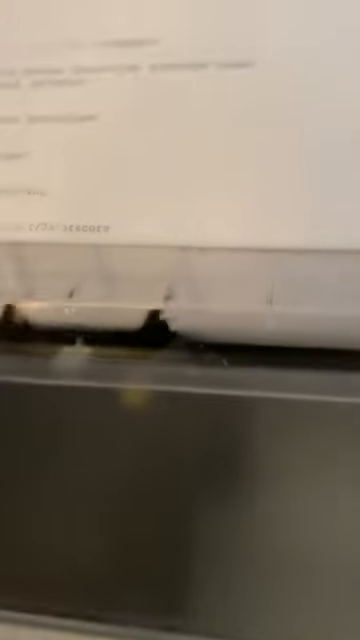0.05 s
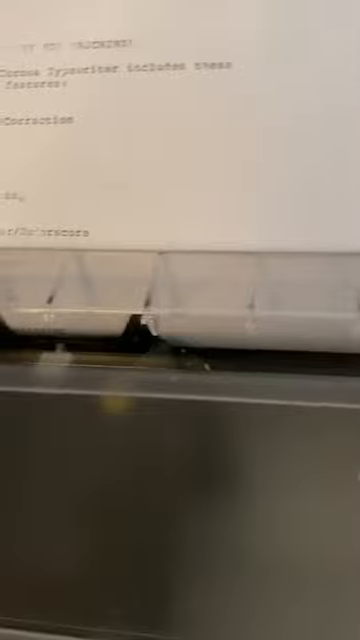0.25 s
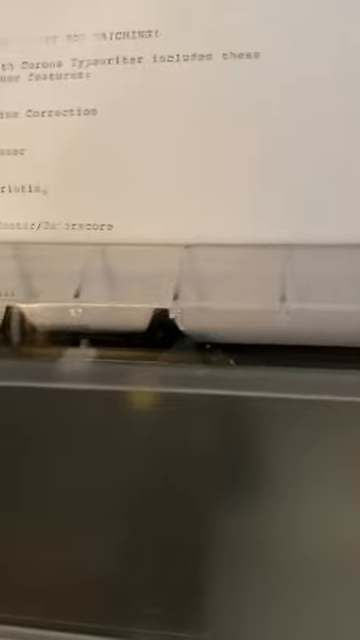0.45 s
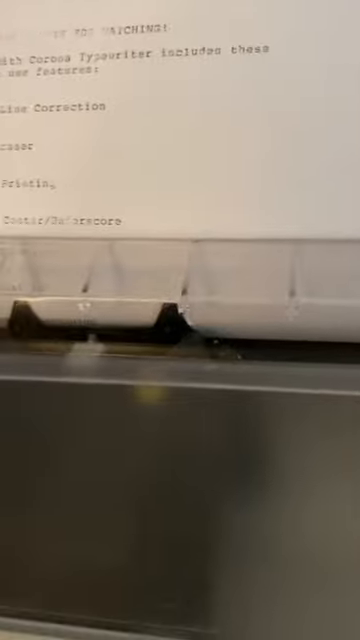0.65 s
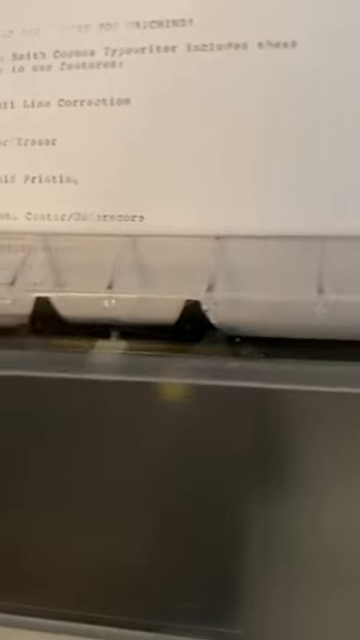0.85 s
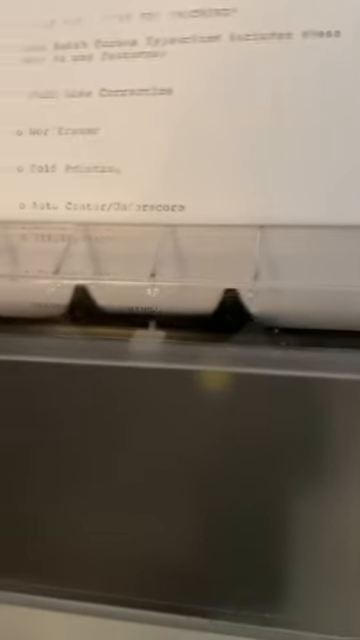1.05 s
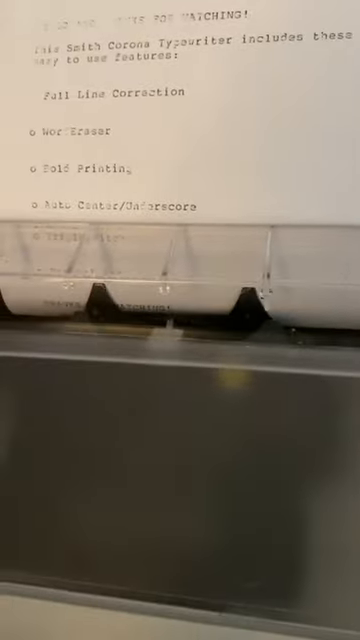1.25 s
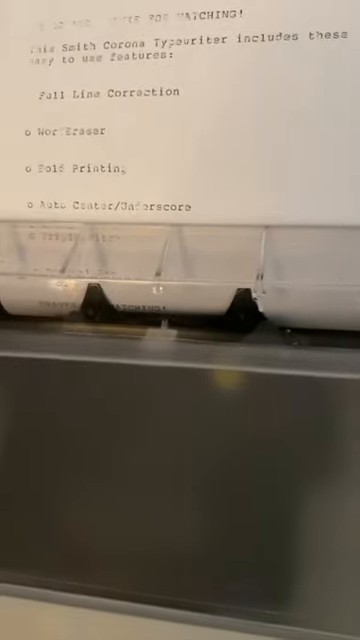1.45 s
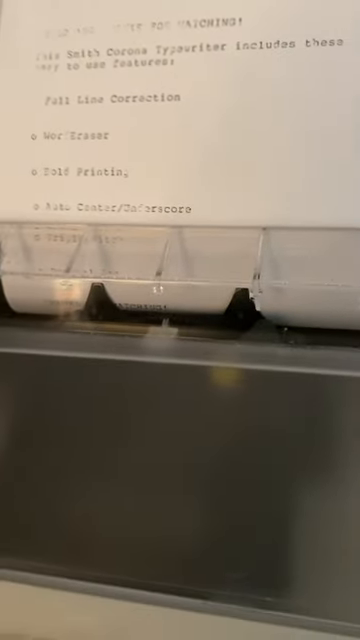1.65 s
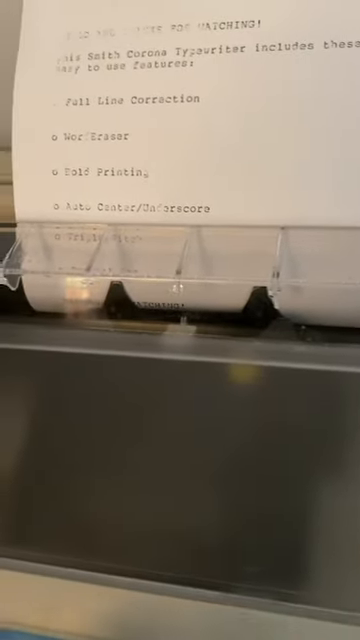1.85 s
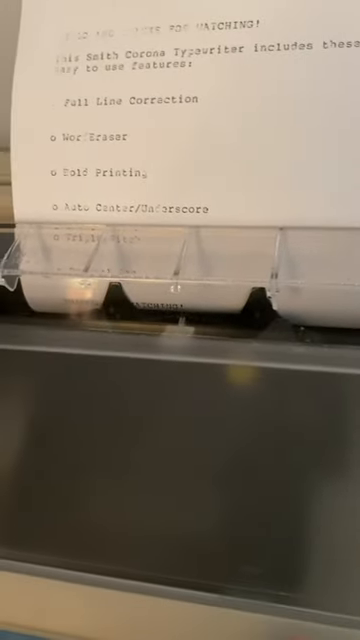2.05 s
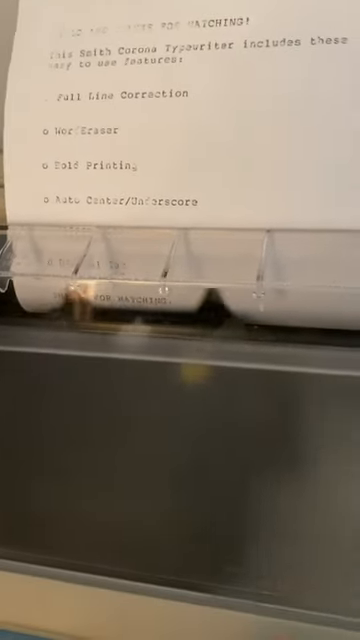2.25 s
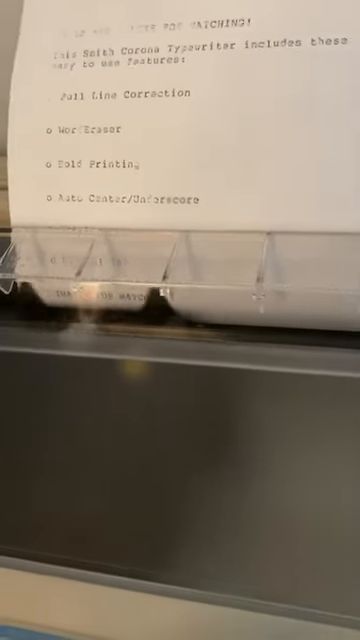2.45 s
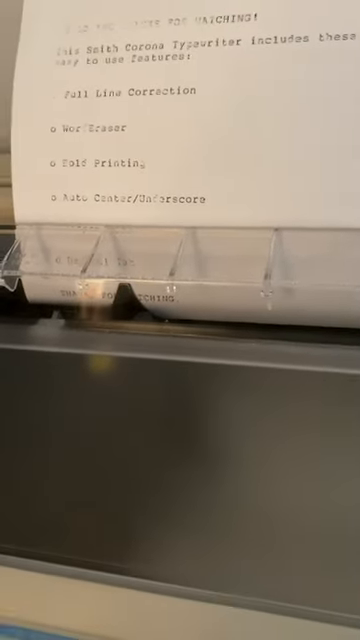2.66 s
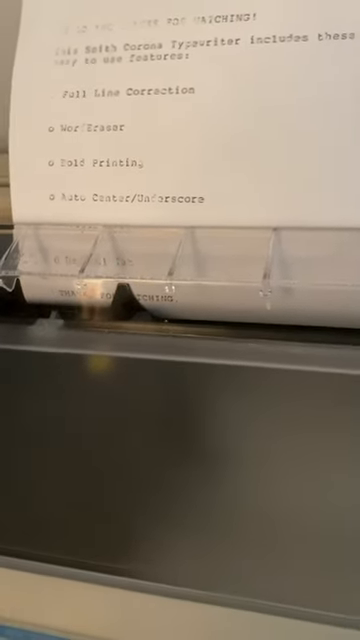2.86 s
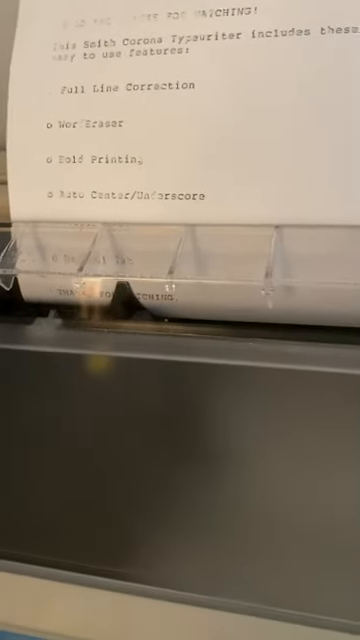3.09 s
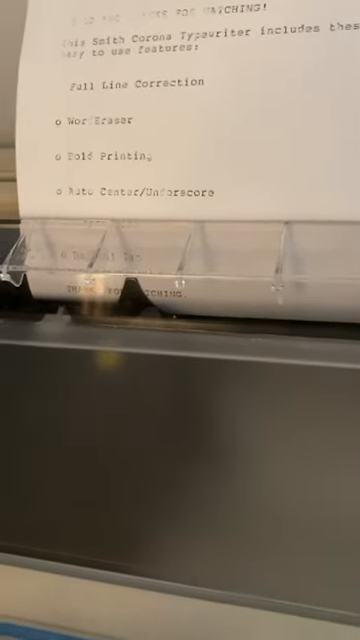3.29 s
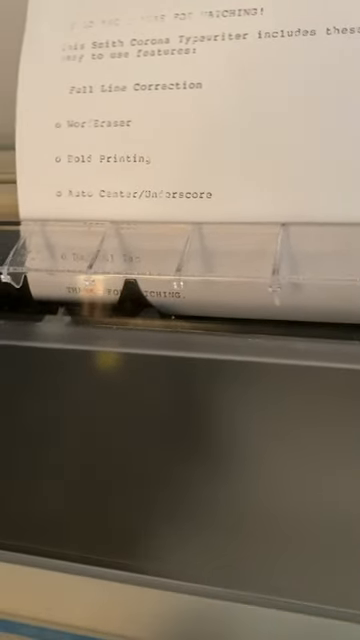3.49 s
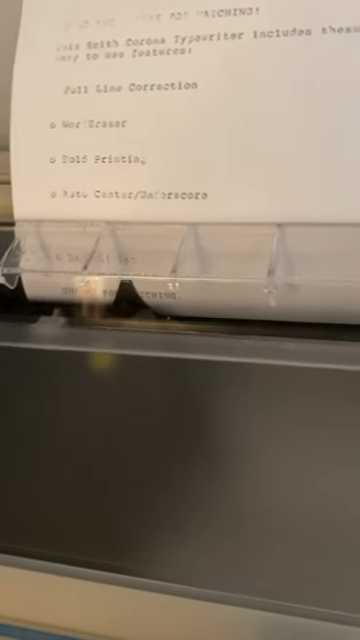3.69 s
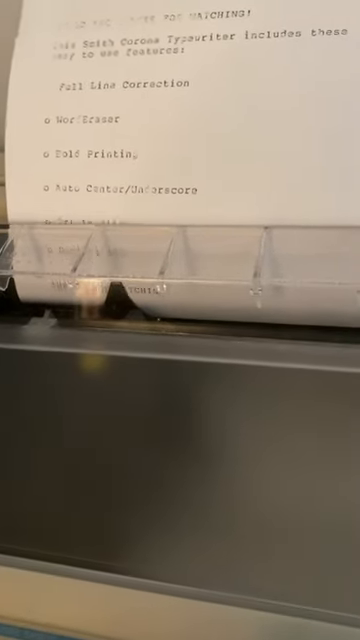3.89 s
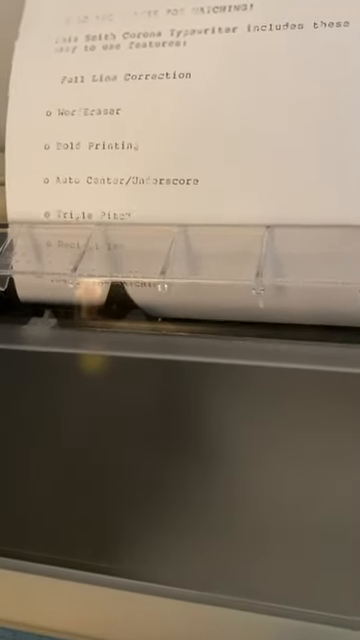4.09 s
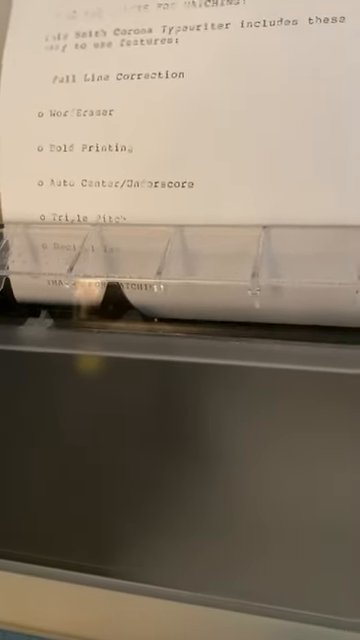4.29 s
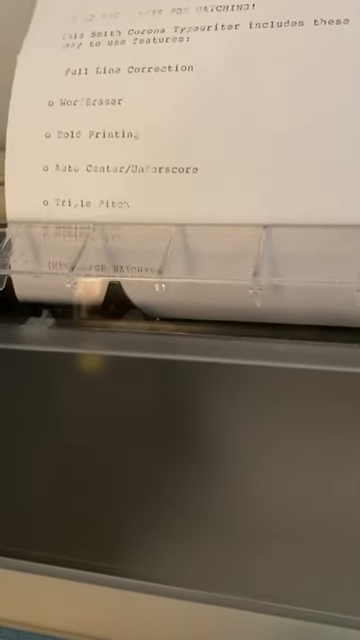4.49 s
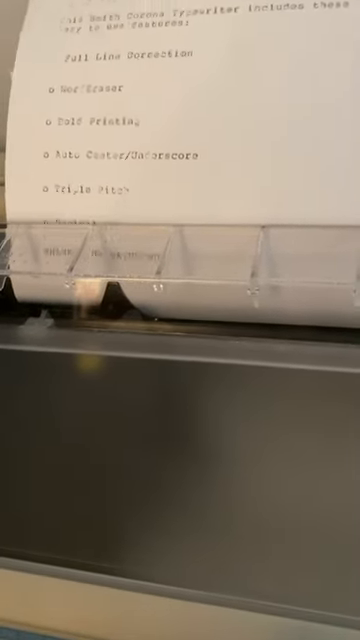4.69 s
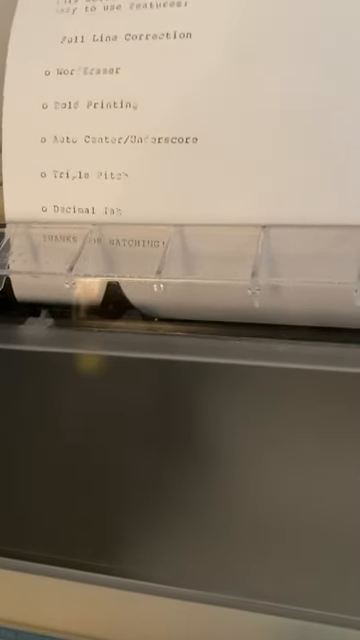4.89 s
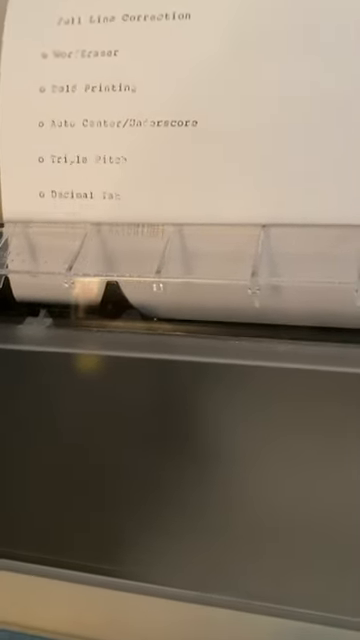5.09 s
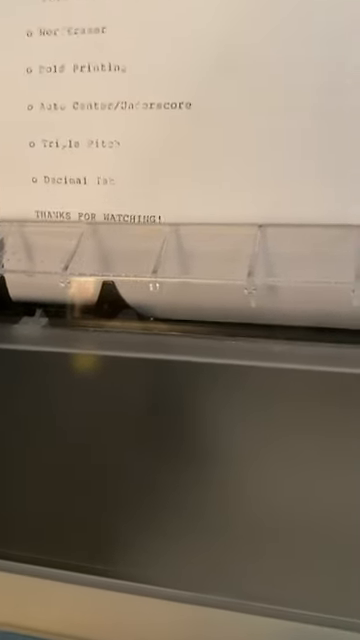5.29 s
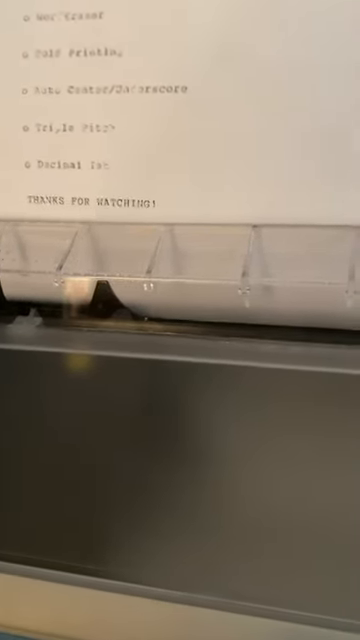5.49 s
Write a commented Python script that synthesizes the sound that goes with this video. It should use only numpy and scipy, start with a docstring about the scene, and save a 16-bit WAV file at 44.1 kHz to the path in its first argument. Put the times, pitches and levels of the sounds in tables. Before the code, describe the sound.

Close sharp clacks and a heavy carriage knock, followed by brief groaning motor whirs and a steady grinding buzz as paper feeds out.

```python
"""Mains hum and building rumble of a quiet room, then an electronic typewriter close by: solenoid clacks
and a carriage knock, short broadband blows that excite resonances of plastic case, metal parts and frame.
A stepper motor feeds the paper in bursts: its tones are multiples of one rotor cycle, and it groans in short
tones, while fluttering noise makes the case rumble and the gear grind. Decaying noise bursts are the crackling sheet."""
import sys
import numpy as np
from scipy import signal
from scipy.fft import rfft, irfft
from scipy.io import wavfile
from scipy.ndimage import uniform_filter1d

SR = 44100
rng = np.random.default_rng(int(sys.argv[2]) if len(sys.argv) > 2 else 0)


def generate_wav(sig):
    """Save sig (samples, or channels by samples) to the path in sys.argv[1] as 16-bit PCM at SR."""
    pcm = np.round(np.clip(np.atleast_2d(sig).T, -1, 1) * 32767).astype(np.int16)
    wavfile.write(sys.argv[1], SR, pcm)


N = 244314
HZ = np.fft.rfftfreq(N, 1 / SR)

# Spells in which the motor is powered. Each row: on and off in seconds, t60 of the coasting gears in seconds,
# spin-up in seconds, base levels in dB of whine, step tone, rotor tone, case rumble and gear grind,
# change of whine and step tone in dB per second.
FEEDS = [(2.128, 2.38, 0.26, 0.082, -32, -37, -44, -40, -44, -23),
         (2.419, 2.661, 0.19, .04, -34.5, -48, -43, -40, -47, -81),
         (3.742, 3.987, 0.16, 0.11, -32.5, -41, -54.5, -44.5, -46.5, 6.5),
         (4.03, 4.132, 0.11, 0.046, -32, -37, -45, -41.5, -49.5, -48),
         (4.167, 4.194, 0.16, 0.035, -38, -43, -47, -39.5, -52, -3),
         (4.236, 5.602, .1, 0.049, -33, -37, -48.5, -45, -47, -0.75)]


def motor():
    """Periodic torque gives harmonics of the rotor cycle; tooth and case contacts give modulated noise."""
    # Partials of the three tones. Each row: multiple of the rotor cycle, level in dB against the tone's level.
    whine = [(6, -0.5), (12, -16.5), (15, -23), (18, -35.5), (21, -28)]
    step = [(3, -2.5), (9, -27.5)]
    rotor = [(2, 2.5), (4, -6.5), (8, -28), (10, -16), (13, -8)]
    # Spectrum of the shaking case. Each row: frequency in Hz, relative level in dB.
    rumble_spectrum = [(40, -20.5), (90, 2.5), (150, 0.5), (300, 1), (500, -4.5), (850, -9), (1100, -15),
                       (2000, -39)]
    rotor_hz = 67.04   # three steps make one rotor cycle
    hum_stop_t60_s = .05   # the tones stop almost at once

    whine_db, step_db, rotor_db, rumble_db, grind_db = motor_levels()
    phase = 2 * np.pi * rotor_hz * np.arange(N) / SR + 0.027 * drift(22)
    hum = tones(whine, whine_db, phase) + tones(step, step_db, phase)
    hum += tones(rotor, rotor_db + 2.8 * drift(11), phase)
    rumble = from_db(rumble_db + 2.45 * drift(25)) * coloured(rumble_spectrum)
    teeth = rms_one((1 + backlash()) * grit(spread_db=-0.5))
    grind = from_db(grind_db + 1.54 * drift(35)) * teeth

    gears_on = powered(np.transpose(FEEDS)[2])
    tones_on = uniform_filter1d(powered([hum_stop_t60_s] * len(FEEDS)), size=220)
    # the root doubles the decay time: the heavy case shakes on twice as long as the gears
    case_on = uniform_filter1d(gears_on ** .5, size=220)
    return tones_on * hum + case_on * rumble, gears_on * grind


def motor_levels():
    """Transient start: tones rise as the rotor spins up, while the jolt of case and gears decays exponentially."""
    # Added wander; the first row also holds earlier, the last one later.
    # Each row: time in seconds, changes in dB of whine, step tone, case rumble and gear grind.
    wander = [(4.27, 3, -0.5, -1, 0), (4.36, 4, 0.6, -3, -2), (4.54, 3, 2, -5, 8.5),
              (4.63, 0.2, 1, -2, 4.5), (4.72, -1.5, .8, -2, 2), (4.94, 0.2, -0.7, .3, -3.5),
              (4.99, 1.9, -0.5, 4, 3.2), (5.064, 2, 3, -6.5, -7.5), (5.33, 2, -2, 1, 1.1),
              (5.4, 0, -12, 2.5, -0.5), (5.47, 3, -7, 2.5, 1), (5.54, 1.5, -16, -3, -5.5)]
    spin_up_db = -15   # the tones start this far below their running level
    jolt_db, bite_db, jolt_s = 7, 5.5, 0.072   # extra rumble and grind at each start, time constant
    grind_follows = 0.26   # share of the tones' slope that the grind makes too

    t, on = np.arange(N) / SR, np.transpose(FEEDS)[0]
    latest = np.searchsorted(on, t).clip(1) - 1
    on, off, coast, spin_s, whine, step, rotor, rumble, grind, slope = np.transpose(FEEDS)[:, latest]
    since = np.maximum(t - on, 0)
    tone = spin_up_db * np.clip(1 - since / spin_s, 0, 1) + slope * since
    jolt = np.exp(-since / jolt_s)
    whine_db, step_db, rumble_db, grind_db = in_time(wander)
    return (whine + tone + whine_db,
            step + tone + step_db,
            rotor + np.minimum(tone, 0) / 2,
            rumble + jolt_db * jolt + rumble_db,
            grind + bite_db * jolt + grind_follows * slope * since + grind_db)


def powered(t60_s):
    """Free decay after forcing: 1 while the motor is driven, an exponential fall after each stop."""
    t = np.arange(N) / SR
    spells = []
    for (on, off, *levels), t60 in zip(FEEDS, t60_s):
        fall = from_db(-60 * np.maximum(t - off, 0) / t60)
        spells.append((t >= on) * fall)
    return np.max(spells, axis=0)


def tones(orders, level_db, phase):
    """Harmonic synthesis: sines at multiples of the rotor phase, each of rms level_db plus its own dB."""
    partials = sum(from_db(db) * np.sin(k * phase + k * k) for k, db in orders)
    return np.sqrt(2) * from_db(level_db) * partials


def backlash():
    """Impact of loose teeth: random ticks with exponential dB spread, a few much harder, each decaying."""
    ticks_per_s, tick_db, t60_s = 70, -8, 0.02   # tick_db is the least height
    struck = rng.random(N) < ticks_per_s / SR
    extra_db = 2.96 * np.minimum(rng.exponential(1, N), 3)
    return signal.lfilter([1], [1, -from_db(-60 / (t60_s * SR))], struck * from_db(tick_db + extra_db))


def groans():
    """Frequency follows motor speed: short tones, most of them gliding, with a weaker octave."""
    # Speeding up or braking. Each row: start in seconds, length in seconds, start and end frequency in Hz,
    # level in dB.
    glides = [(2.135, 0.086, 106.7, 204, -38), (2.366, 0.047, 390, 302, -37),
              (2.422, 0.037, 295, 397, -36.5), (2.505, 0.036, 340, 340, -37), (2.566, 0.033, 327, 310, -36),
              (2.6, 0.068, 208.6, 97.4, -36), (4.027, 0.046, 220, 276, -39),
              (4.045, 0.046, 117.4, 125, -34.5), (4.17, 0.08, 143, 113, -37)]
    out = np.zeros(N)
    for s, length, start_hz, end_hz, db in glides:
        count = round(length * SR)
        phase = 2 * np.pi * np.cumsum(np.geomspace(start_hz, end_hz, count)) / SR
        tone = np.sin(phase) + 0.25 * np.sin(2 * phase)
        out[round(s * SR):][:count] += 2 * from_db(db) * np.hanning(count) * tone
    return out


def paper_crackle():
    """Impulsive release in the bending sheet: bursts of very uneven noise with a fast rise and slower decay."""
    # Each row: start in seconds, level in dB before the case colours it.
    crackles = [(2.249, -34.5), (2.372, -38), (2.557, -35), (4.121, -40), (4.565, -35), (4.591, -36.5),
                (4.62, -35), (4.741, -36), (4.777, -36.5), (4.825, -38.5), (4.872, -35.5), (4.889, -35.5),
                (5.006, -34), (5.279, -35), (5.371, -35.5), (5.384, -35.5), (5.493, -31)]
    rise_s, t60_s = 0.0012, 0.084
    return bursts([(s, db, rise_s, t60_s) for s, db in crackles]) * grit(spread_db=6.0)


def clacks():
    """Impact excitation: a short rattle drives case and metal; the heavier frame answers later and rings longer."""
    # Latch and hammer parts. Each row: frequency in Hz, relative level in dB, t60 in seconds.
    metal_parts = [(3211, -22.5, 0.031), (3670, -23.5, 0.0052), (3970, -31.5, 0.03), (5380, -32, 0.014)]
    # Desk and frame. Each row: frequency in Hz, level in dB against the thud, t60 in seconds.
    frame_modes = [(63.7, -9, 0.2), (116, -4, 0.25), (172, -7.5, 0.14), (203, -12.5, 0.11), (263.5, -7, .1),
                   (335, -6, 0.16), (422, -4, 0.083), (688, -5, 0.036), (857, -3, 0.063)]
    # Metal rail set ringing by the heaviest knock. Each row: frequency in Hz, level in dB, t60 in seconds.
    rail_modes = [(341.5, -55, 1.9), (530, -55, 1.4), (2820, -71.5, .9)]

    s, rattle_db, rise, t60, lift_db, metal_db, thud_db = contacts()
    contact = bursts(zip(s, rattle_db, rise, t60)) * grit(spread_db=2.0)
    latest = np.searchsorted(s, np.arange(N) / SR).clip(1) - 1
    rattle = treble(case(contact, patchy_db=4.5), lift_db[latest], hz=2570)
    metal_drive = contact * from_db(metal_db[latest])
    metal = sum(from_db(db) * ring(metal_drive, hz, ring_t60) for hz, db, ring_t60 in metal_parts)

    at = ((s + rise + .003) * SR).astype(int)
    frame = np.zeros(N)
    strength_db = 3 * rng.standard_normal((len(s), len(frame_modes)))   # each blow lands a little differently
    for k, (hz, db, ring_t60) in enumerate(frame_modes):
        push = np.full(N, 1e-18)
        push[at] = from_db(thud_db + db + strength_db[:, k]) * (-1) ** k
        frame += ring(push, hz, ring_t60)

    hardest = np.full(N, 1e-18)
    hardest[at[np.argmax(thud_db)]] = 1
    rail = sum(from_db(db) * ring(hardest, hz, ring_t60) for hz, db, ring_t60 in rail_modes)
    return rattle + metal + uniform_filter1d(frame, size=21) + rail


def contacts():
    """Collision and restitution: blows, a weaker rebound of each, and slow-rising carriage slides, in time order.

    Columns: start s, rattle dB, rise s, t60 s, treble lift dB, metal drive dB, thud dB."""
    # Clacks and knocks. Each row: start in seconds, rattle level in dB, t60 in seconds, treble lift in dB,
    # metal drive in dB, thud level in dB.
    blows = [(0.4217, -31, .046, 12.5, -21, -54), (0.427, -18.5, 0.036, 5, 5, -28.5),
             (.53, -55, 0.06, -18, -18, -50), (.57, -59.5, 0.053, -14, -23, -58),
             (0.905, -42, 0.042, -2.5, -17, -46), (1.095, -31.5, 0.067, 4, 3, -45),
             (1.101, -15, 0.028, 1.5, 6.5, -20), (1.129, -30.5, 0.02, 7.5, -14.5, -28.5),
             (1.173, -30, 0.026, 5.5, 8, -29), (1.2256, -33, 0.053, 5.5, 0.5, -48),
             (1.24, -33.5, 0.042, -8.5, -18, -38.5), (2.109, -45, 0.17, 4.5, -6, -45),
             (2.1354, -25, .021, -9.5, -3, -35.5), (3.733, -35, 0.013, 0, 16.5, -38),
             (3.7387, -25.5, 0.019, 8, 2, -30.5), (4.03, -48, 0.061, -5.5, -2, -40.5),
             (4.164, -34, 0.035, -20, -24, -39), (4.239, -41, 0.037, -4, -17, -32)]
    # One rebound: delay in seconds, rattle in dB against the blow, t60 in seconds, treble lift in dB,
    # metal drive in dB, thud in dB against the blow.
    rebound = (.013, -17.5, 0.17, -8.5, -9, -1)
    # The carriage slides. Each row: start in seconds, rattle level in dB, t60 in seconds.
    slides = [(.984, -31.5, 0.13), (1.041, -34, 0.41)]
    blow_rise_s, slide_rise_s = .0026, 0.014
    slide_lift_db, slide_metal_db, slide_thud_db = -8, -4, -42

    delay, less_rattle_db, rebound_t60, rebound_lift_db, rebound_metal_db, less_thud_db = rebound
    rows = []
    for s, db, t60, lift, metal, thud in blows:
        rows.append((s, db, blow_rise_s, t60, lift, metal, thud))
        rows.append((s + delay, db + less_rattle_db, blow_rise_s, rebound_t60,
                     rebound_lift_db, rebound_metal_db, thud + less_thud_db))
    for s, db, t60 in slides:
        rows.append((s, db, slide_rise_s, t60, slide_lift_db, slide_metal_db, slide_thud_db))
    return np.transpose(sorted(rows))


def case(x, patchy_db):
    """Modal radiation: plastic panels, unevenly driven, resonate over a broad base; white noise keeps its rms."""
    # Panel resonances. Each row: frequency in Hz, width in Hz, relative level in dB.
    panels = [(867, 91, 5.5), (1430.4, 89, 12.5), (2149, 170, 2.5), (2780, 150, 8), (3380, 390, 5),
              (4567, 720, 2), (5240, 190, 2.5), (6530, 870, 3.5), (7923, 400, 4.5), (9620, 900, -4),
              (14100, 1500, -7)]
    # Broad base. Each row: frequency in Hz, relative level in dB.
    base_spectrum = [(200, -13), (500, 7.5), (1000, 2.5), (3000, -2), (6000, -19), (10000, -13.5),
                     (15000, -37.5), (16000, -45.5)]
    uneven = [from_db(patchy_db * drift(24)) for panel in panels]

    def shape(v):
        out = irfft(rfft(v) * from_db(at_hz(base_spectrum)), N)
        for k, (hz, width_hz, db) in enumerate(panels):
            out = out + (-1) ** k * from_db(db) * resonance(v * uneven[k], hz, width_hz)
        return out

    return shape(x) / np.std(shape(rng.standard_normal(N)))


def tail(x):
    """Diffuse reverberation of desk and room: convolution with exponentially decaying noise."""
    level_db, t60_s, rise_s = -21, .22, 0.0086
    t = np.arange(SR // 2) / SR
    response = rng.standard_normal(len(t)) * from_db(-60 * t / t60_s) * np.minimum(t / rise_s, 1)
    unit_energy = response / np.sqrt(np.sum(response ** 2))
    return from_db(level_db) * signal.fftconvolve(x, unit_energy)[:N]


def room():
    """Stationary background: mains partials of wavering level, swelling building rumble and filtered noise."""
    # Mains partials. Each row: frequency in Hz, level in dB rms before wavering.
    mains = [(59.5, -64), (119, -66), (238, -69.5)]
    # Room noise spectrum. Each row: frequency in Hz, relative level in dB.
    room_spectrum = [(15, -62), (25, -24.5), (36, -6.5), (60, -2.5), (86, -14.5), (122, -1), (146, -20),
                     (180, -12.5), (265, -27.5), (357, -23), (383, -27), (528, -31.5), (6000, -48),
                     (7800, -75.5), (13200, -120)]
    room_db, rumble_db, hiss_db = -52.5, -57.5, -91.5

    t = np.arange(N) / SR
    hum = sum(np.sqrt(2) * from_db(db + 2.0 * drift(7)) * np.sin(2 * np.pi * hz * t) for hz, db in mains)
    # spectra as (Hz, relative dB)
    low_noise = coloured([(25, -34.5), (45, -6), (58, 22.5), (85, 10.5), (120, -44.5)])
    rumble = from_db(rumble_db + 2.5 * drift(1.5)) * low_noise
    hiss = from_db(hiss_db) * coloured([(4000, -30), (6500, 6.0), (14500, 4.5), (15500, 7.5), (16200, -7)])
    return hum + rumble + hiss + from_db(room_db) * coloured(room_spectrum)


def from_db(db):
    """Logarithmic level: dB to amplitude gain."""
    return 10 ** (np.asarray(db) / 20)


def rms_one(x):
    """Power normalisation: scale to rms 1."""
    return x / np.sqrt(np.mean(x ** 2) + 1e-20)


def in_time(rows):
    """Linear interpolation: columns of a timed curve, one value a sample."""
    s, *columns = np.transpose(rows)
    return [np.interp(np.arange(N) / SR, s, c) for c in columns]


def at_hz(points):
    """Interpolation on a log-frequency axis: a spectrum read at every FFT bin."""
    hz, values = np.transpose(points)
    return np.interp(np.log(HZ + 1), np.log(hz), values)


def coloured(spectrum):
    """Spectral shaping of white noise: steady noise of a given spectrum, rms 1."""
    return rms_one(irfft(rfft(rng.standard_normal(N)) * from_db(at_hz(spectrum)), N))


def drift(rate):
    """Low-passed random process: wander of spread 1, faster for a higher rate in Hz."""
    knots = rng.standard_normal(N // 40 + 2002)   # one every 40 samples
    r = np.exp(-80 * np.pi * rate / SR)
    slow = signal.lfilter([1], [1, -2 * r, r * r], knots)[2000:]   # without the filter's settling
    return np.interp(np.arange(N) / 40, np.arange(len(slow)), rms_one(slow))


def grit(spread_db):
    """Many small contacts: noise of rms 1 whose strength varies from millisecond to millisecond."""
    return rms_one(rng.standard_normal(N) * from_db(spread_db * drift(400)))


def bursts(rows):
    """Transient envelopes summed from rows (s, dB, rise s, t60 s): a linear rise, then exponential decay."""
    env = np.full(N, 1e-9)
    for s, db, rise, t60 in rows:
        start = round(s * SR)
        t = np.arange(N - start)[:SR // 2] / SR
        rise, t60 = max(rise, 2e-4), max(t60, 4e-3)
        fall = from_db(db - 60 * np.maximum(t - rise, 0) / t60)
        env[start:][:len(t)] += np.minimum(t / rise, 1) * fall
    return env


def resonance(x, hz, width_hz):
    """Damped resonator: two-pole band-pass, gain 1 on top."""
    r = np.exp(-np.pi * width_hz / SR)
    poles = [1, -2 * r * np.cos(2 * np.pi * hz / SR), r * r]
    return signal.lfilter([(1 - r * r) / 2, 0, (r * r - 1) / 2], poles, x)


def ring(x, hz, t60):
    """Impulse response of a mode: a unit click starts a decaying sine of initial height 1."""
    r, w = from_db(-60 / (t60 * SR)), 2 * np.pi * hz / SR
    return signal.lfilter([0, np.sin(w)], [1, -2 * r * np.cos(w), r * r], x)


def treble(x, lift_db, hz):
    """Shelving filter: raises or lowers what lies above hz; the lift may vary in time."""
    high = signal.sosfilt(signal.butter(1, hz, "high", fs=SR, output="sos"), x)
    return x + (from_db(lift_db) - 1) * high


def stereo(x):
    """Stereo image: left and right carry one sound with frequency-dependent phase and level, plus an unalike share."""
    # Each row: frequency in Hz, phase of left against right in half turns.
    phase_difference = [(0, 0), (600, -.1), (1200, -.2), (2400, .35), (4400, .3), (5600, .05), (6000, .2),
                        (6450, .9), (6650, 1), (8150, 1), (8450, 2), (12300, 2), (12600, 3), (14800, 3),
                        (15200, 4), (22050, 4)]
    # Each row: frequency in Hz, left minus right level in dB.
    balance = [(200, -.3), (700, 1.5), (1300, -1.2), (2400, -4), (4400, -1), (6500, 0)]
    # Unalike share, opposite in the two channels. Each row: frequency in Hz, level in dB.
    diffuse = [(100, -40), (450, -28), (700, -15), (3000, -11), (6000, -14), (6600, -35)]

    hz, half_turns = np.transpose(phase_difference)
    # half of the phase and level difference goes to left, the inverse to right
    half = from_db(at_hz(balance) / 2) * np.exp(.5j * np.pi * np.interp(HZ, hz, half_turns))
    scatter = rng.standard_normal(SR // 12) * from_db(np.linspace(0, -30, SR // 12))
    unit_energy = scatter / np.sqrt(np.sum(scatter ** 2))
    unalike = rfft(unit_energy, N) * from_db(at_hz(diffuse))
    return irfft(rfft(x) * np.array([half + unalike, 1 / half - unalike]), N)


def scene():
    """Superposition: paper feed, blows with their reverberation, and room, spread over left and right."""
    hum, grind = motor()
    cased = case(grind + paper_crackle(), patchy_db=1.05)
    feed = hum + groans() + treble(cased, -7, hz=4060)
    blows = clacks()
    return stereo(feed + blows + tail(blows) + room())


def record(dry):
    """Band limiting: the microphones lose the deepest bass; the top is cut steeply."""
    dry = signal.sosfilt(signal.butter(4, 46, "high", fs=SR, output="sos"), dry)
    return signal.sosfilt(signal.cheby2(16, 85, 16877, fs=SR, output="sos"), dry)


dry = scene()
out = record(dry)
generate_wav(out)
```